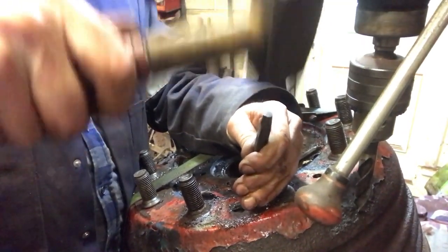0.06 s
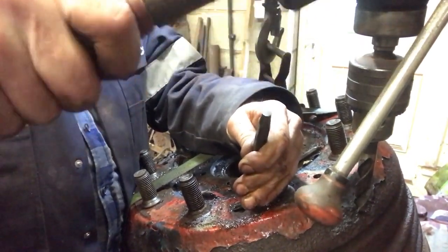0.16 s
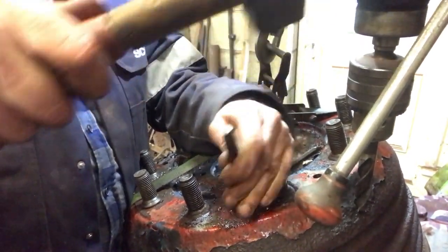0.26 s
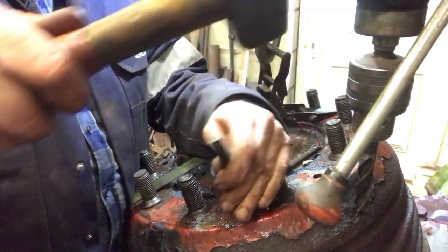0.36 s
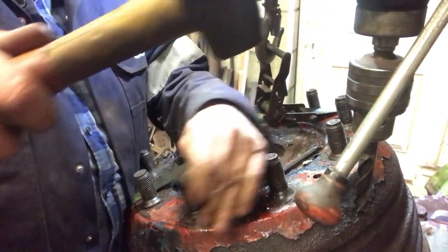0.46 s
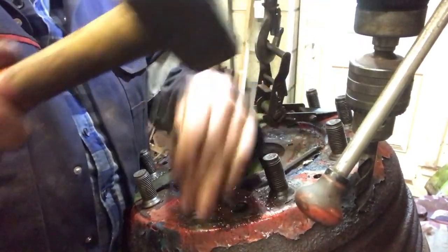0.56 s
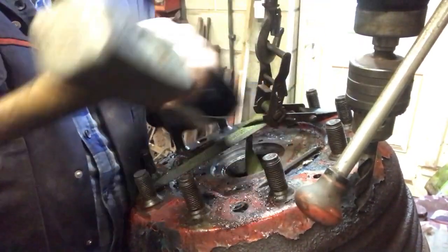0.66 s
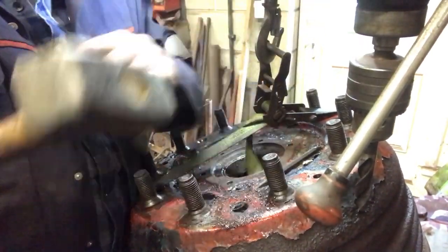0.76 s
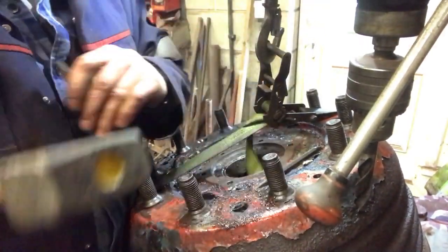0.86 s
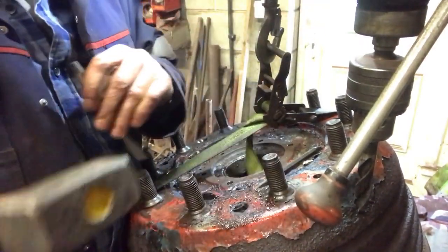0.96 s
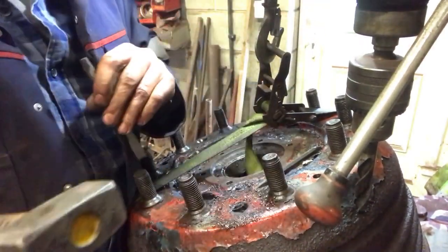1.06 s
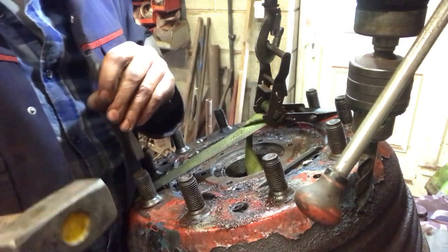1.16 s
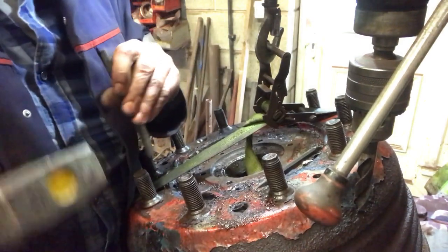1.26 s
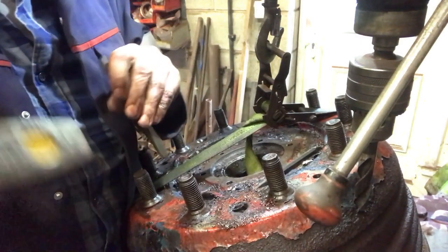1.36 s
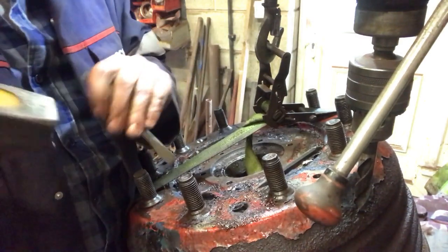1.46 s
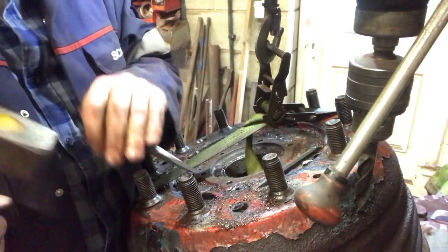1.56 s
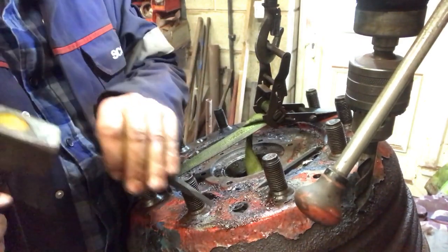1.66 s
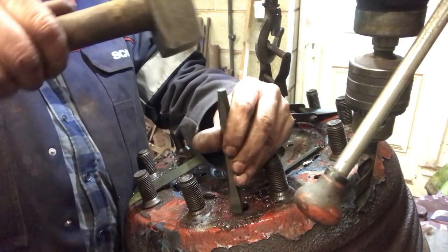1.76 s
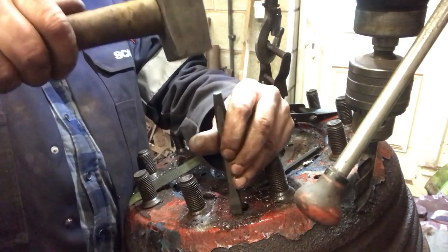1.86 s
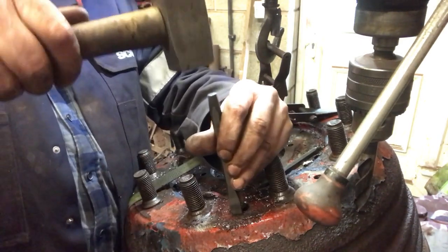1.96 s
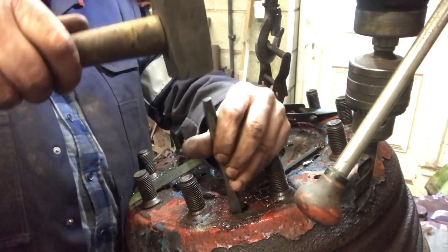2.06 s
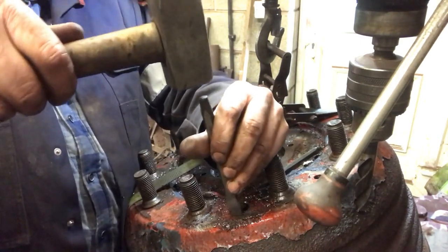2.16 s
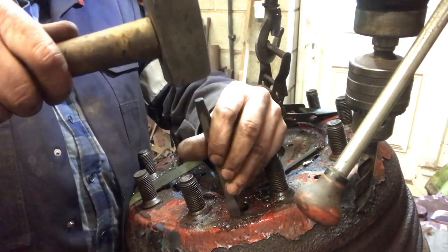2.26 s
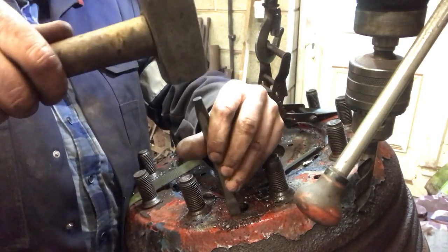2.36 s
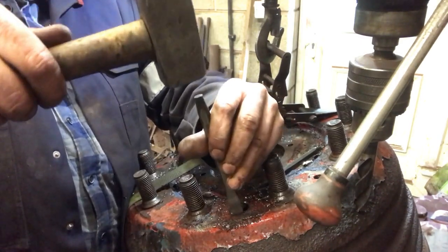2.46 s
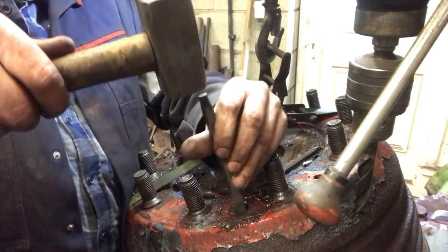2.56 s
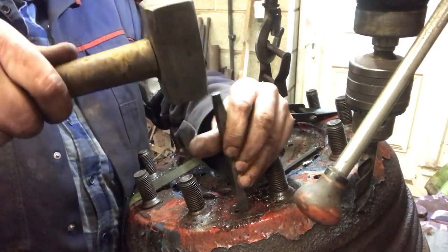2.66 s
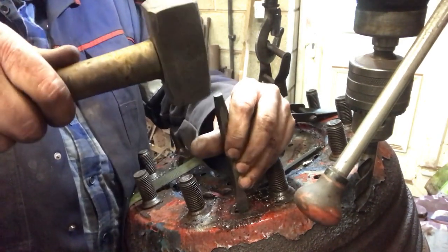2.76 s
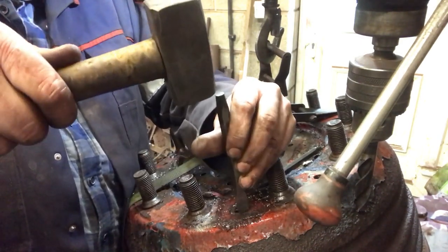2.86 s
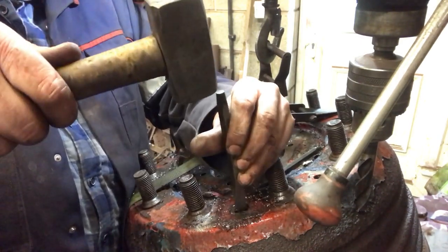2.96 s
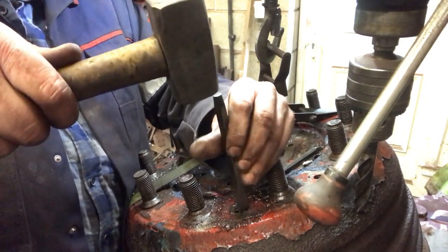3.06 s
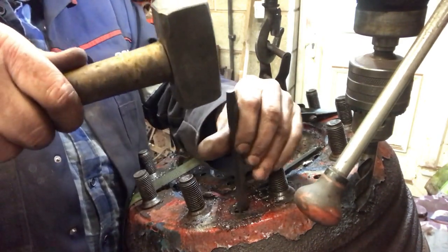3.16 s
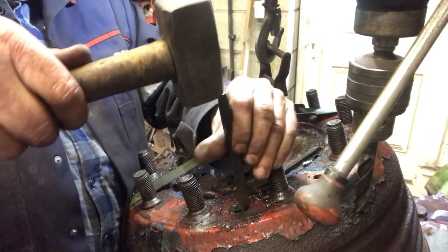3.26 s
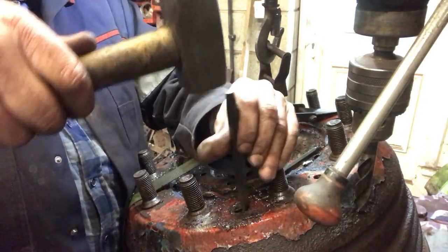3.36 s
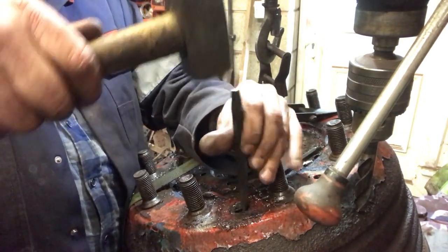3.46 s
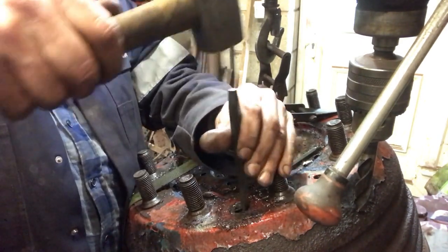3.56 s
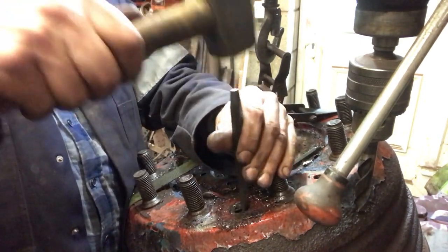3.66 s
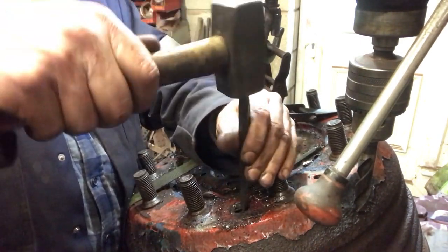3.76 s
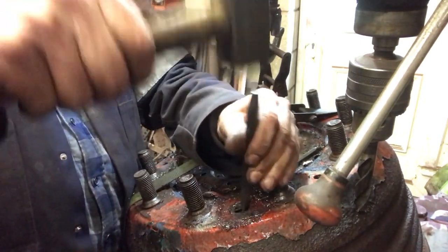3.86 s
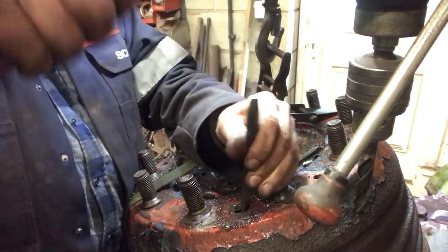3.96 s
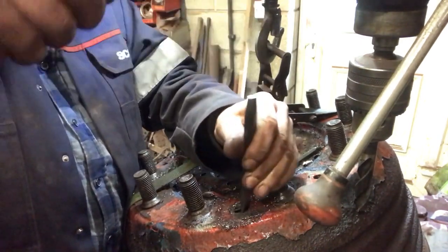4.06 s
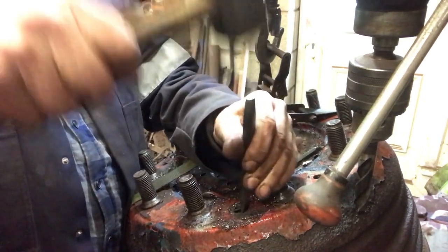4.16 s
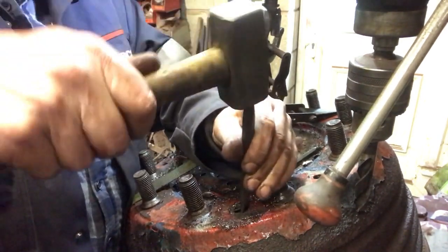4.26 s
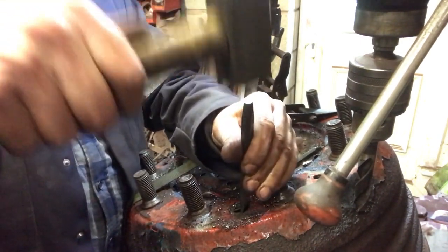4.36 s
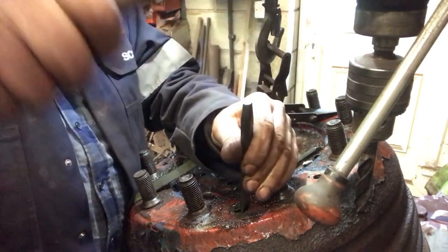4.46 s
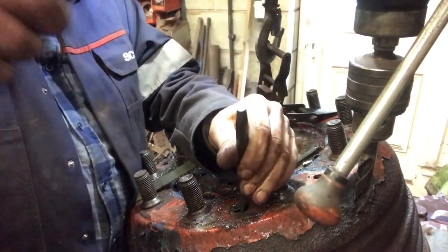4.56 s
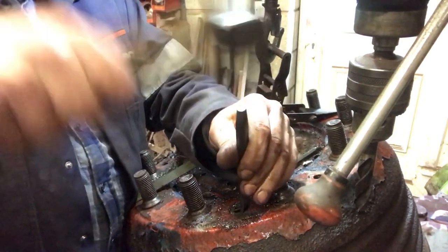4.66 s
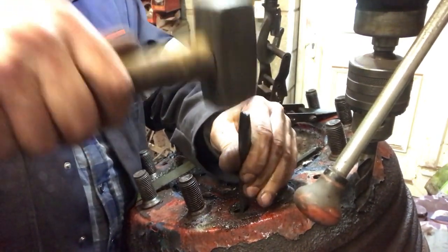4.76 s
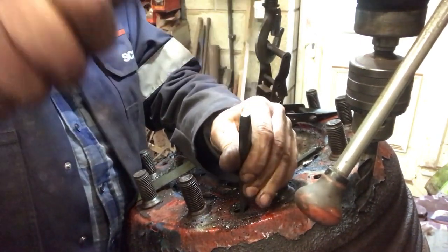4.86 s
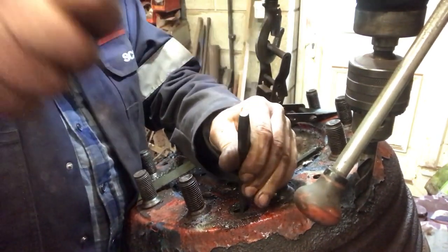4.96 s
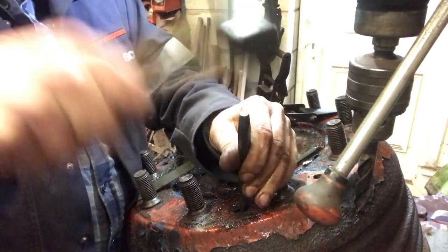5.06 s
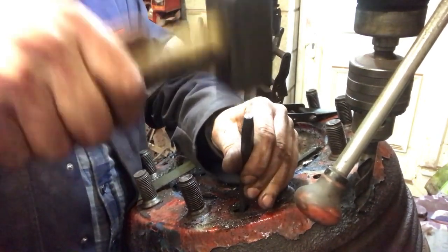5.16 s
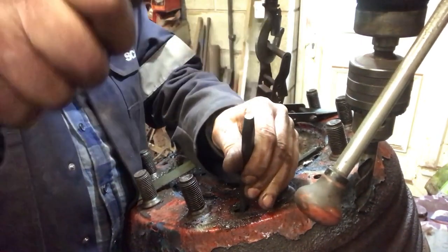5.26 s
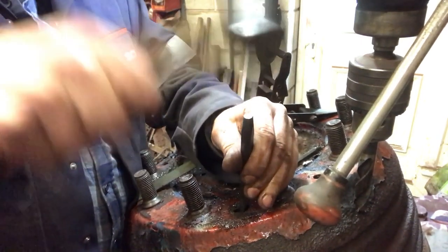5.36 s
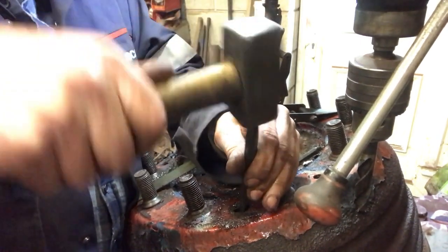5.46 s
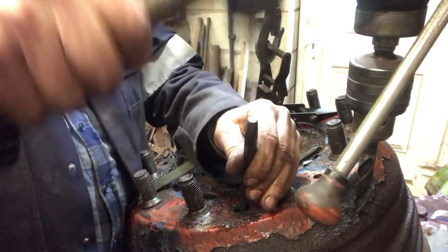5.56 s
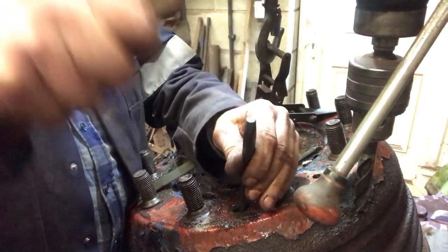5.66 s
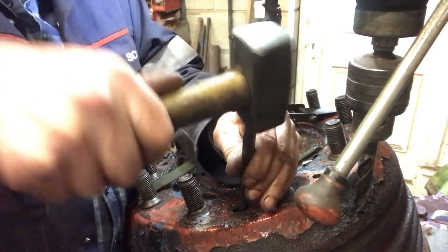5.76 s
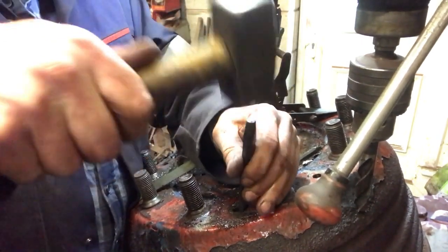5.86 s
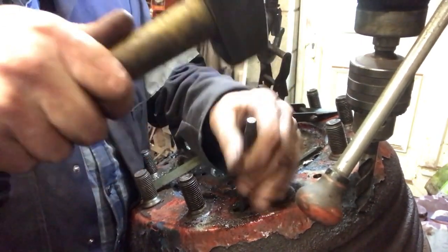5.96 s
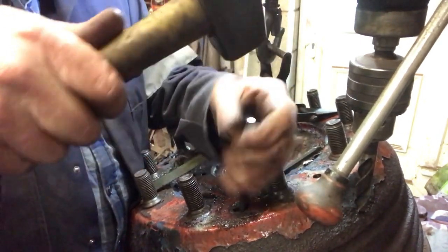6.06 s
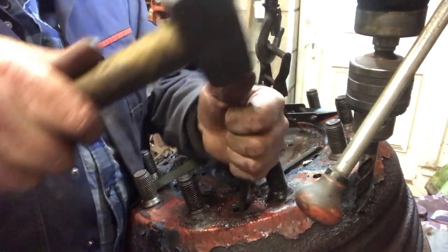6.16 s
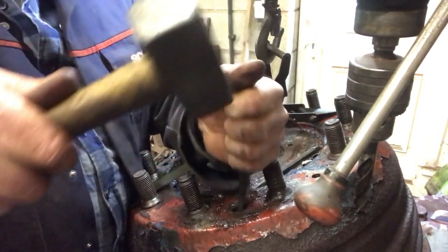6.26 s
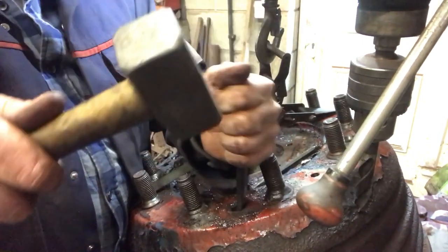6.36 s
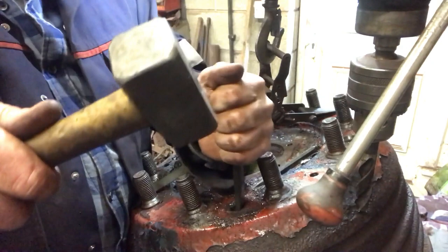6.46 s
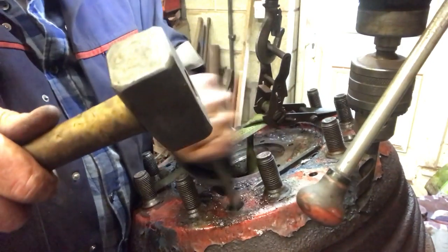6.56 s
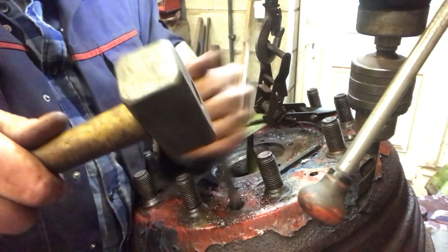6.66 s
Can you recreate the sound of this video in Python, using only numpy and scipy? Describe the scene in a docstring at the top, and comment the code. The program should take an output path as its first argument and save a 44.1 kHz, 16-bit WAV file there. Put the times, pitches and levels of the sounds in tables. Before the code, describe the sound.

In a quiet workshop, a lump hammer hits a chisel once against a stud on a heavy steel housing, with a sharp crack and a short ring. A pause follows, filled with faint cloth rustle, dry ticks and light clinks as the chisel is repositioned. Then six hard blows come in a quickening run, ringing and rattling loose parts. Soft rubbing and a few ticks close it, all heard from nearby.

```python
"""A quiet workshop, where a lump hammer drives a cold chisel against a stud on a heavy steel housing.
Each blow cracks, rings the housing's modes and clatters through loose parts; some bounce and land again.
Between runs the chisel is set down, touched by the hammer and shifted, with light clinks and dry ticks.
Underneath lie noise beds: cloth rustle, rubbing, low rumble and the hush of the shop.
A hiss and a low flutter linger after the last blows."""
import sys
import numpy as np
from scipy import signal
from scipy.io import wavfile

SR = 44100
rng = np.random.default_rng(int(sys.argv[2]) if len(sys.argv) > 2 else 0)


def materialize(psi):
    """Save the field psi as 16-bit PCM at rate SR to the path in sys.argv[1].

    A 1-D psi becomes a single channel; in a 2-D psi each row is a channel.
    """
    bounded = np.clip(np.atleast_2d(psi).T, -1, 1)
    quanta = np.round(bounded * 32767).astype(np.int16)
    wavfile.write(sys.argv[1], SR, quanta)


N = 296352

# colour of the room tone: (frequency [Hz], relative density [dB])
HUSH_COLOUR = [(20, -20), (45, -3), (100, -8), (180, -12.5), (300, -6.5), (600, -17.5), (1200, -19.5),
               (2000, -22), (3500, -24.5), (6500, -29.5), (9000, -39.5), (16500, -42.5)]
# low rumble: (time [s], level [dB])
RUMBLE_CURVE = [(0, -63.5), (.8, -65.5), (1.15, -73), (1.5, -63), (1.9, -83.5), (4.9, -77), (5.3, -60.5),
                (6.1, -70), (6.72, -92)]
# colour of the cloth-like hiss: (frequency [Hz], relative density [dB])
HISS_COLOUR = [(300, -33.5), (700, 0), (1500, 0), (4000, -7.5), (8000, -13.5), (16000, -21)]
# first spell: cloth rustle and rubbing; second: hiss and low flutter lingering after the blows,
# then rustle and rubbing from about 6.1 s: (time [s], hiss [dB], low flutter [dB])
HISS_SPELLS = [
    [(.25, -49, -59), (.42, -74.5, -72), (.8, -65.5, -72.5), (1.0, -69.5, -61), (1.25, -79.5, -94),
     (1.58, -62, -88), (1.72, -67.5, -75)],
    [(4.95, -81, -91), (5.25, -54, -56), (5.45, -69, -59), (5.95, -62, -60), (6.06, -57, -53.5),
     (6.2, -71, -69), (6.44, -65, -61.5), (6.54, -60.5, -50.5), (6.61, -60.5, -59.5), (6.72, -50.5, -51)],
]
# dry knocks and ticks of handling: (time [s], starting level [dB], centre [Hz], t60 [s])
HANDLING_TICKS = [(.58, -48.5, 3400, 0.052), (.601, -46.5, 3460, 0.062), (0.998, -53.5, 898, 0.044),
                  (1.24, -58, 910, .05), (1.536, -44, 1980, 0.015), (2.113, -51, 3030, 0.036),
                  (2.277, -53.5, 3900, 0.028), (2.34, -61, 6360, .012), (2.762, -48, 2820, .03),
                  (4.104, -34.5, 1140, .04), (4.108, -29.5, 1110, 0.038), (4.116, -31, 1510, 0.044),
                  (4.134, -45, 776, 0.056), (6.038, -45.5, 2130, 0.074), (6.263, -57.5, 2590, 0.036),
                  (6.313, -53.5, 2510, 0.042), (6.387, -56, 13000, .015), (6.422, -50.5, 14000, .015),
                  (6.458, -58, 14000, .02), (6.61, -66, 3500, .015), (6.641, -48.5, 5500, .012),
                  (6.673, -34, 7000, 0.014), (6.712, -49, 505, 0.031)]
# light touches on the chisel:
# (time [s], strength [dB], housing share [dB], contact [s], brightness [dB/octave])
CHISEL_TOUCHES = [(0.579, -54.5, 14, .007, 12.5), (0.601, -55, 15, .013, 13.5),
                  (2.074, -42, -16, 0.0084, -2), (2.112, -39, 3.5, .008, 0), (2.205, -37, -9, 0.012, 0),
                  (2.224, -31, -12.5, 0.023, 2.5), (2.254, -32.5, -9.5, 0.01, -2),
                  (2.407, -39, -5, .025, -1), (2.586, -48, 1, .005, -0.5), (2.631, -44.5, -2, 0.031, -2),
                  (2.763, -38, 5, 0.0038, 3), (3.116, -29.5, -6.5, .012, -0.5),
                  (3.287, -44.5, -18.5, .012, 4), (3.298, -21.5, -15.5, 0.0028, -3),
                  (3.386, -64, -8, 0.0038, 9)]
# modes of the hand-held chisel: (pitch [Hz], level [dB], t60 [s])
CHISEL_MODES = [(2560, -5, .08), (2625, 0, .045), (4250, -18, .03), (6400, -3, .04), (6960, -7, .035),
                (11460, -16, .045), (13090, -21, .04)]
# clatter of a strike: (frequency [Hz], crack [dB], crack t60 [s], tail [dB], tail t60 [s])
CLATTER_BANDS = [(108, -46.5, 0.05, -57, 0.27), (270, -20.5, 0.088, -47.5, 1), (560, -24.5, 0.036, -38, .5),
                 (1200, -23, 0.049, -41, 0.66), (2500, -9.5, 0.091, -31.5, 0.42),
                 (5000, -10, .06, -23, 0.27), (8600, -12, 0.081, -30.5, 0.31),
                 (16200, -21, .05, -30.5, 0.12)]
# modes of the housing: (pitch [Hz])
HOUSING_PITCHES = [247, 505, 813, 885, 914, 957, 1480, 1714, 1771, 2190, 2365, 2640, 2832, 2900, 3265, 3482,
                   3843, 4180, 4400, 4720, 5243, 5696, 6040, 6162, 7251, 7830, 8900, 9510, 10700, 11500]
# how each of those modes rings: (level [dB], t60 before the treble cap [s])
HOUSING_RINGS = [(-24, 0.57), (-34, 0.96), (-22, 0.33), (-18.5, .25), (-9, 0.18), (-12.5, .2),
                 (-23.5, 0.16), (-6.5, 0.2), (-15.5, 0.24), (-9.5, 0.15), (-10.5, 0.13), (-17.5, 0.056),
                 (-15, 0.17), (-17.5, 0.076), (-15.5, 0.27), (-14.5, 0.3), (-13, 0.14), (-18.5, 0.14),
                 (-26.5, 0.15), (-20, .12), (-12.5, 0.055), (-16.5, .13), (-17, 0.28), (-15.5, 0.3),
                 (-22, 0.04), (-20, 0.04), (-22, 0.59), (-19, 0.32), (-16.5, 0.082), (-26, 0.13)]
# the chisel bounces and lands again: (time [s], strength [dB], extra weight below 2 kHz [dB])
CHISEL_REBOUNDS = [(.033, -23.5, 1), (.1, -36.5, 19.5), (3.956, -50.5, 11.5), (5.0, -58, 26),
                   (5.55, -40, 17.5), (5.62, -41.5, 17), (5.872, -32, 7), (6.038, -57, 11)]
# full hammer blows: (time [s], strength [dB], thud [dB], low ring [dB], middle ring [dB],
# brightness [dB/octave], first favoured ring [Hz], second favoured ring [Hz])
HAMMER_BLOWS = [(.008, -9.5, 8.5, 2.5, 2.5, 0.5, 3226, 9023),
                (3.843, -14.5, -2.5, -8.5, -2, -1, 3550, 7250),
                (4.346, -15.5, -4, -9, 2.5, -0.5, 2110, 8370), (4.79, -12, 4.5, -2, 14, 2.5, 3730, 5670),
                (5.158, -11.5, 0.5, -5, 5.5, 2, 1748, 9570), (5.494, -11.5, 5.5, 6, 4, 3, 2710, 10400),
                (5.833, -12, 6.5, 8.5, -3, 4, 3864, 6170)]


def from_db(db):
    """Decibels to gain."""
    return 10 ** (np.asarray(db) / 20)


def rms_one(x):
    """Scale to unit rms."""
    return x / np.sqrt(np.mean(x ** 2) + 1e-20)


def at_hz(rows, hz):
    """All columns of a table, read at one frequency on a log axis."""
    rows = np.array(rows)
    return [np.interp(np.log(hz), np.log(rows[:, 0]), column) for column in rows[:, 1:].T]


def filtered(x, hz, kind="band", order=2):
    """Butterworth filter, band-pass by default."""
    return signal.sosfilt(signal.butter(order, hz, kind, fs=SR, output="sos"), x)


def clicks(times, sizes):
    """A train of impulses."""
    out = np.full(N, 1e-18)
    np.add.at(out, np.minimum(np.round(times * SR).astype(int), N - 1), sizes)
    return out


def fade(x, t60):
    """Each impulse becomes a jump that dies away."""
    return signal.lfilter([1], [1, -from_db(-60 / (t60 * SR))], x)


def ring(x, hz, t60):
    """A resonator: a unit impulse starts a dying sine of height 1."""
    radius, angle = from_db(-60 / (t60 * SR)), 2 * np.pi * hz / SR
    return signal.lfilter([0, np.sin(angle)], [1, -2 * radius * np.cos(angle), radius ** 2], x)


def drift(rate_hz):
    """A smooth random wobble of rms 1."""
    pole = np.exp(-80 * np.pi * rate_hz / SR)
    slow = signal.lfilter([1], [1, -2 * pole, pole ** 2], rng.standard_normal(N // 40 + 2002))[2000:]
    return np.interp(np.arange(N) / 40, np.arange(len(slow)), rms_one(slow))


def bands(per_octave):
    """Narrow noise bands: (centre [Hz], width [Hz], noise of rms 1)."""
    white = rng.standard_normal((2, N))
    edges = 20 * 2 ** np.arange(0, 10, 1 / per_octave)
    for k, (low, high) in enumerate(zip(edges, edges[1:])):
        yield np.sqrt(low * high), high - low, rms_one(filtered(white[k % 2], [low, high]))


def coloured(spectrum, flicker_db):
    """Noise of a given colour whose bands flicker a little; rms 1."""
    return rms_one(sum(from_db(at_hz(spectrum, hz)[0] + flicker_db * drift(21)) * np.sqrt(width) * noise
                       for hz, width, noise in bands(2)))


def shop_hush(level_db=-64):
    """Room tone: a dark bed of noise that slowly wavers."""
    return from_db(level_db + 1.5 * drift(1.1)) * coloured(HUSH_COLOUR, flicker_db=2.46)


def low_rumble():
    """A deep rumble that swells and sinks."""
    level_db = np.interp(np.arange(N) / SR, *np.transpose(RUMBLE_CURVE)) + 2.5 * drift(3.3)
    return from_db(level_db) * rms_one(ring(rng.standard_normal(N), hz=56, t60=.074))


def hiss_and_flutter(crackles_per_s=36, ramp_s=.15):
    """Crackly hiss and a fluttering low resonance: cloth and rubbing, or a wash after the blows."""
    t, levels = np.arange(N) / SR, np.zeros((2, N))
    for spell in HISS_SPELLS:
        times, *curves_db = np.transpose(spell)
        gate = np.clip(np.minimum(t - times[0], times[-1] + ramp_s - t) / ramp_s, 0, 1)
        levels += gate * from_db([np.interp(t, times, curve) for curve in curves_db])
    hiss_gain, flutter_gain = levels
    flutter = rms_one(ring(rng.standard_normal(N), hz=280, t60=.03)) * from_db(2 * drift(25))
    crackles = (rng.random(N) < crackles_per_s / SR) * from_db(4 * rng.exponential(1, N).clip(0, 3))
    hiss = coloured(HISS_COLOUR, flicker_db=2) * (1 + from_db(-4) * fade(crackles, t60=.019))
    return hiss_gain * hiss + flutter_gain * flutter


def handling_ticks(spread=1.61, edge_db=-15, edge_t60=.0079):
    """Each tick is a puff of band noise with a brief bright edge."""
    length = SR // 5
    out, t = np.zeros(N + length), np.arange(length) / SR
    for time, level_db, hz, t60 in HANDLING_TICKS:
        noise = rng.standard_normal(length)
        puff = rms_one(filtered(noise, [hz / spread, min(hz * spread, .45 * SR)]))
        edge = from_db(edge_db - 60 * t / edge_t60) * np.diff(noise, prepend=0)
        start = round(time * SR)
        out[start:start + length] += from_db(level_db) * (puff * from_db(-60 * t / t60) + edge)
    return out[:N]


def chisel_clinks(impacts=8):
    """A touch is a short skid: small impacts of either sign set the chisel ringing."""
    times, touch_db, _, contact_s, bright_db = np.transpose(CHISEL_TOUCHES)
    skid_s = times[:, None] + contact_s[:, None] * rng.random((len(times), impacts)) ** 1.2
    push = rng.standard_normal(skid_s.shape)
    out = np.zeros(N)
    for hz, level_db, t60 in CHISEL_MODES:
        tilt_db = bright_db * np.log2(hz / 2600)
        strength = from_db(touch_db + level_db - 18.5 + tilt_db + rng.normal(0, 4.5, len(times)))
        skids = clicks(skid_s, strength[:, None] * push)
        softened = filtered(skids, [hz / 1.2, hz * 1.2], order=1)  # the hand softens each click
        flutter = .74 + .53 * drift(115)
        out += flutter * ring(softened, hz, t60)
    return out


def strikes():
    """Blows and rebounds in the columns of HAMMER_BLOWS; a rebound is a duller blow."""
    rebounds = [(time, strength_db, 1.4 * weight_db, weight_db, weight_db, -6.5, 2500, 5950)
                for time, strength_db, weight_db in CHISEL_REBOUNDS]
    return np.vstack([HAMMER_BLOWS, rebounds])


def strike_db(hz, ring_share, favour_db=12, favour_octaves=.08):
    """Each strike's drive at one frequency: where the chisel stands picks modes, hardness the treble."""
    _, strength_db, thud_db, low_db, middle_db, bright_db, *favoured_hz = strikes().T
    octave = np.log2(hz / 3000)
    knee_octaves = [-5, -3.6, -2.6, -1.7, -.8, -.4]
    body_db = [np.interp(octave, knee_octaves, [0, thud, thud / 2, low, middle, 0])
               for thud, low, middle in zip(thud_db, ring_share * low_db, ring_share * middle_db)]
    nearness = np.exp(-.5 * (np.log2(hz / np.array(favoured_hz)) / favour_octaves) ** 2).max(axis=0)
    return strength_db + body_db + bright_db * max(octave, 0) + ring_share * favour_db * nearness


def clatter(snap_t60=.012):
    """Countless short modes and the shop's echo: a crack, then a tail, the bass swelling later."""
    times, _, thud_db, *_ = strikes().T
    rattle = from_db(2 * drift(27))  # loose parts shake unevenly
    out = np.zeros(N)
    for hz, _, noise in bands(7):
        if hz < 110:
            continue
        crack_db, crack_t60, tail_db, tail_t60 = at_hz(CLATTER_BANDS, hz)
        drive_db = strike_db(hz, ring_share=.55) + rng.normal(0, 2, len(times))
        hits = clicks(times, from_db(drive_db - 6.5))
        # the steel faces snap at first contact; a blow that thuds more snaps less
        snaps = clicks(times, from_db(drive_db - 1 - 1.9 * thud_db))
        envelope = from_db(crack_db) * (fade(hits, crack_t60) + fade(snaps, snap_t60))
        envelope += from_db(tail_db) * fade(hits, tail_t60) * rattle
        swell = np.exp(-hz / (1.5 * SR))
        out += noise * signal.lfilter([1 - swell], [1, -swell], envelope)
    return out


def housing_ring(max_t60_cycles=1900):
    """Strikes and touches ring every mode of the steel housing with a strength of its own."""
    strike_s = strikes()[:, 0]
    touch_s, touch_db, share_db, *_ = np.transpose(CHISEL_TOUCHES)
    out = np.zeros(N)
    for hz, (level_db, t60) in zip(HOUSING_PITCHES, HOUSING_RINGS):
        reach_db = -8 * abs(np.log2(hz / 1200))  # a light touch reaches mainly the middle modes
        light_db = touch_db + share_db + reach_db + rng.normal(0, 4.5, len(touch_s))
        heavy_db = strike_db(hz, ring_share=.59) + rng.normal(0, 1.3, len(strike_s))
        drive = clicks(strike_s, from_db(heavy_db)) + clicks(touch_s, from_db(light_db))
        rough = np.clip(hz / 5500 - .25, 0, .95)  # studs and loose parts roughen the upper modes
        flutter = np.sqrt(1 - rough ** 2) + rough * drift(60)
        out += from_db(level_db - 9) * flutter * ring(drive, hz, min(t60, max_t60_cycles / hz))
    return out


def scene(low_cut_hz=110):
    """Hush, small noises and struck metal in one mono mix."""
    background = shop_hush() + low_rumble()
    small_noises = hiss_and_flutter() + handling_ticks()
    metal = chisel_clinks() + clatter() + housing_ring()
    metal = filtered(metal, low_cut_hz, "high")  # the struck metal carries little deep bass
    return (background + small_noises + metal)[None]


def record(dry, ceiling=.92, stopband_hz=16800):
    """Soft saturation rounds the peaks and a steep low-pass cuts the top."""
    rounded = ceiling * np.tanh(dry / ceiling)
    return signal.sosfilt(signal.cheby2(12, 60, stopband_hz, fs=SR, output="sos"), rounded)


dry = scene()
out = record(dry)
materialize(out)
```